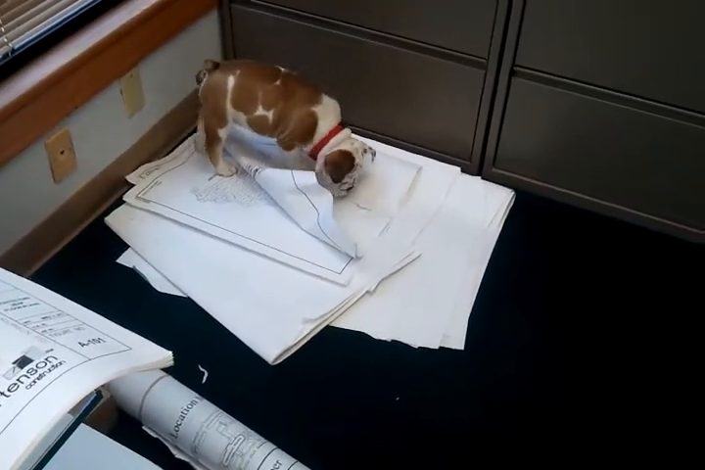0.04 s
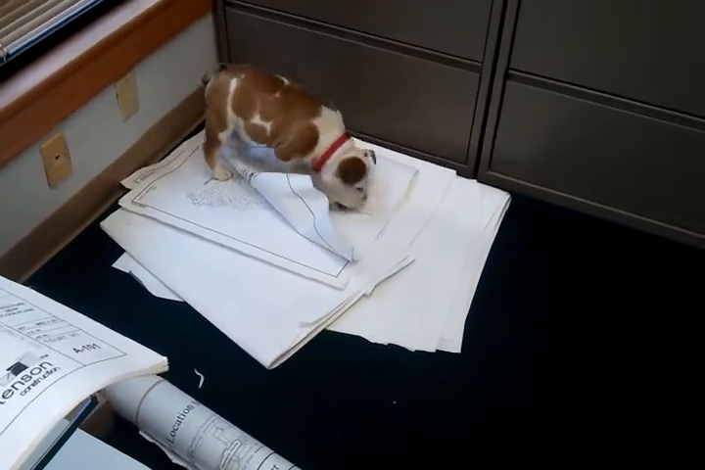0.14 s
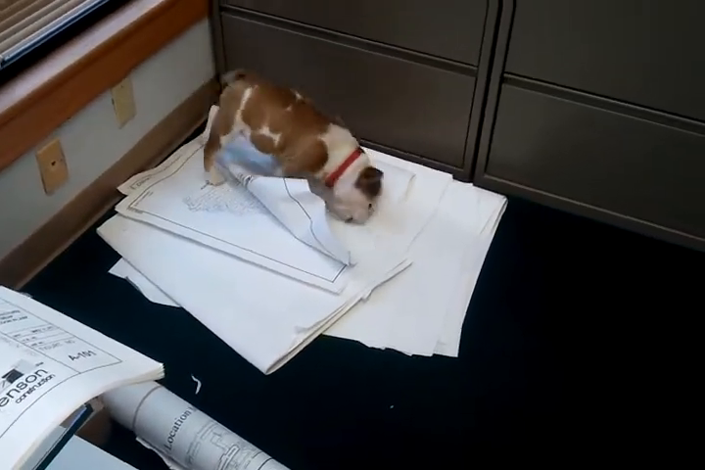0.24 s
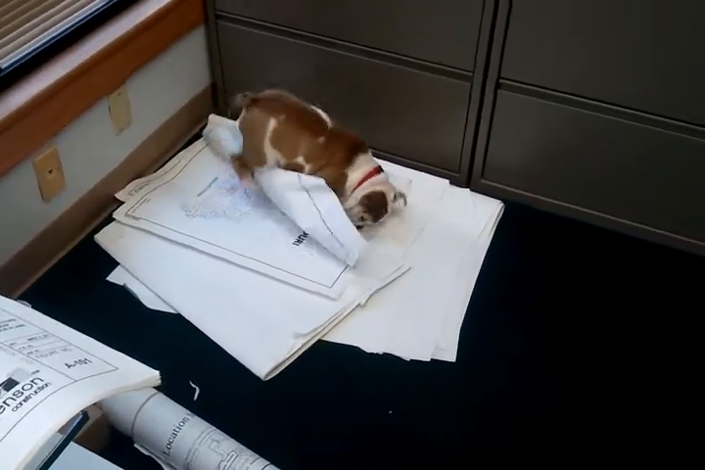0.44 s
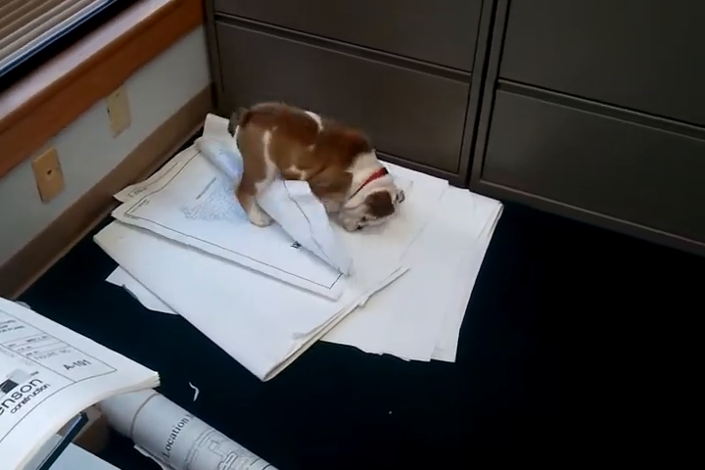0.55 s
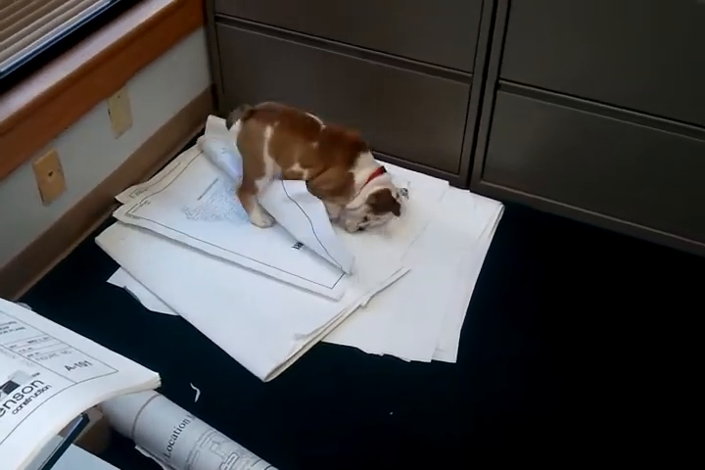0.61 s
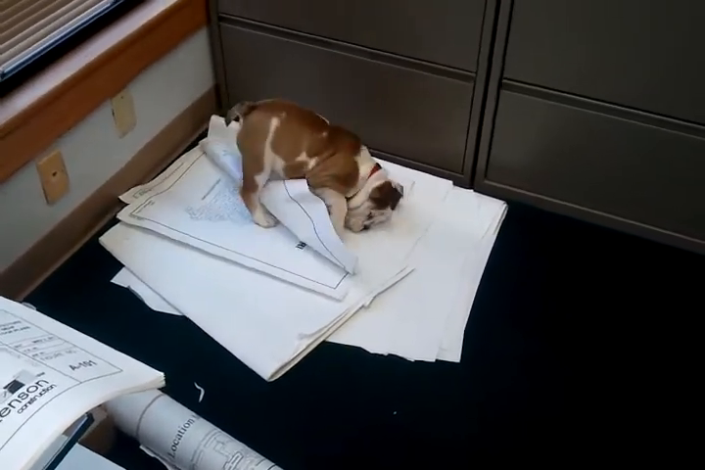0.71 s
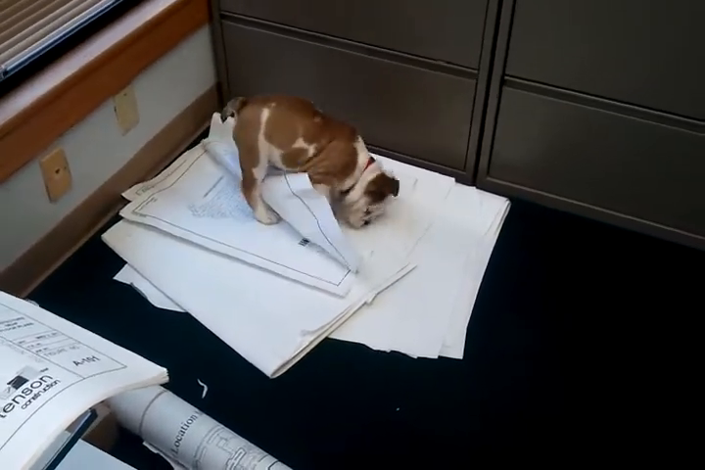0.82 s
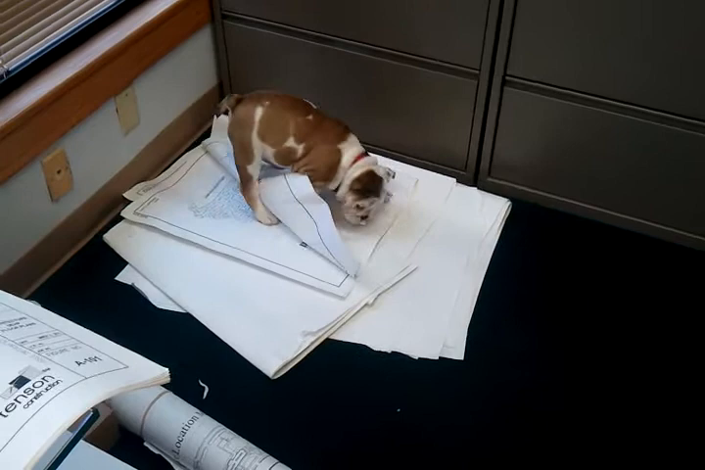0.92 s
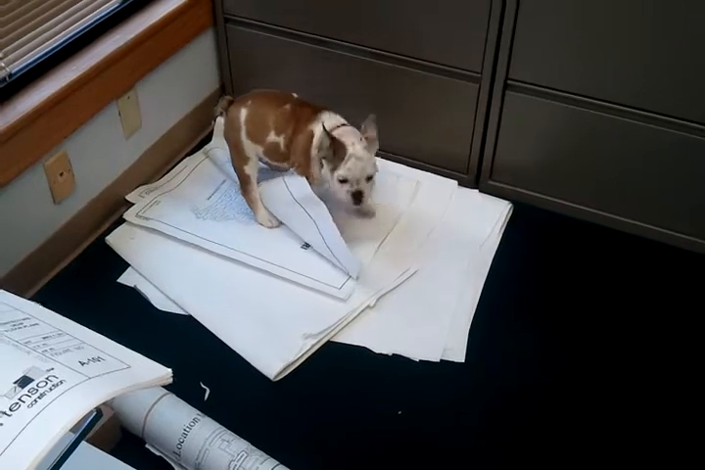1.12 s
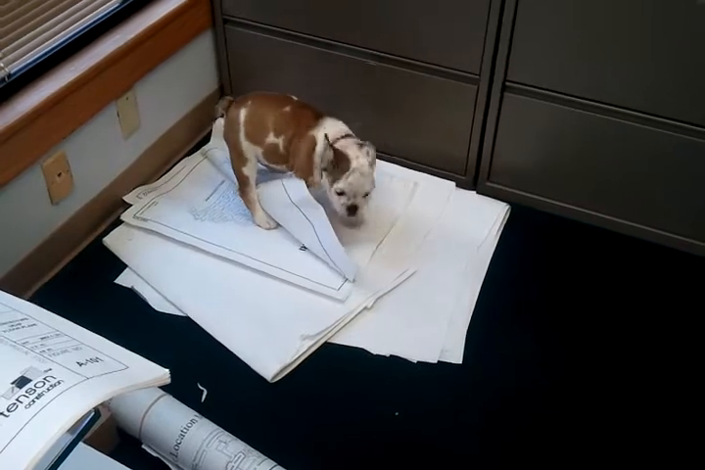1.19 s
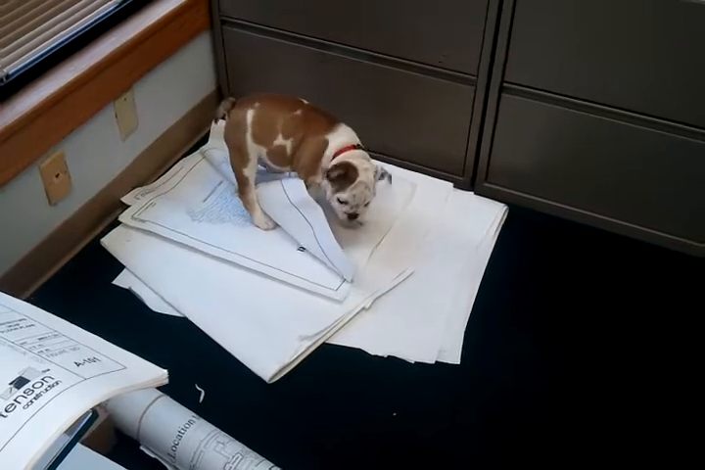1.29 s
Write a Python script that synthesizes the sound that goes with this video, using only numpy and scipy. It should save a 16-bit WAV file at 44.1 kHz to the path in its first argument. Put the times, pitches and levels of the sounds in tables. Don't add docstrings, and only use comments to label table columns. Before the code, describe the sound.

Paper rustling: sharp creases snap and sheets buckle hollowly in quick uneven bursts with a bright sliding hiss, soft paw thuds beneath, then a pause, another crackle and small ticks, over faint room hum.

```python
import sys
import numpy as np
from scipy import signal
from scipy.fft import rfft, irfft
from scipy.io import wavfile

SR = 44100
rng = np.random.default_rng(int(sys.argv[2]) if len(sys.argv) > 2 else 0)


def store_pcm(level_fs):
    pcm = np.round(np.clip(level_fs, -1, 1) * 32767).astype(np.int16)
    wavfile.write(sys.argv[1], SR, np.atleast_2d(pcm).T)


def how_loud(loudness_db):
    steps = np.asarray(loudness_db, float) / 20
    return 10 ** steps


N = 59535


def rms_one(x):
    return x / np.sqrt(np.mean(x ** 2) + 1e-20)


def drift(rate_hz):
    settle = 9000
    r = np.exp(-2 * np.pi * rate_hz / SR)
    wander = signal.lfilter([1], [1, -2 * r, r * r], rng.standard_normal(N + settle))
    return rms_one(wander[settle:])


def at_hz(spectrum, hz):
    point_hz, point_db = np.transpose(spectrum)
    return np.interp(np.log(hz), np.log(point_hz), point_db)


def colour(x, spectrum, centre_octave=0, narrowing_db=0):
    hz = np.maximum(np.fft.rfftfreq(4096, 1 / SR), 10)
    octave = np.log2(np.clip(hz, 100, 12000) / 1000)
    level_db = at_hz(spectrum, hz) - narrowing_db * (octave - centre_octave) ** 2
    cepstrum = irfft(np.log(how_loud(level_db)))
    cepstrum[1:2048] *= 2
    cepstrum[2049:] = 0
    response = irfft(np.exp(rfft(cepstrum)))
    return rms_one(signal.fftconvolve(x, response)[:N])


def grains(rate, spread_db, clump_db):
    sizes = how_loud(spread_db * np.minimum(rng.exponential(1, N), 3.0)) * rng.choice([-1, 1], N)
    born = rng.random(N) < rate / SR
    bed = 0.41 * rng.standard_normal(N)
    return (rms_one(sizes * born) + bed) * how_loud(clump_db * drift(220))


def envelope(start_s, hold_s, t60_s, rise_s):
    t = np.arange(N) / SR - start_s
    fading_s = np.maximum(t - rise_s - hold_s, 0)
    return np.clip(t / rise_s, 0, 1) * how_loud(-60 * fading_s / t60_s)


def burst(noise, shape):
    shaped = shape * noise
    return shaped * np.sqrt(np.sum(shape ** 2) / np.sum(shaped ** 2))


def click(start_s):
    return np.maximum(1 - abs(np.arange(N) - start_s * SR), 0)


def ring(x, hz, t60_s):
    r = how_loud(-60 / (t60_s * SR))
    w = 2 * np.pi * hz / SR
    return signal.lfilter([0, np.sin(w)], [1, -2 * r * np.cos(w), r * r], x + 1e-18)


def highpass(x, order, hz):
    return signal.sosfilt(signal.butter(order, hz, "high", fs=SR, output="sos"), x)


def room_noise():
    # frequency_hz, level_db
    noise_spectrum = [(20, -31), (60, -12), (90, -18), (220, -8.5), (300, -11.5), (800, -16.5),
                      (2500, -21.5), (7000, -21.5), (11000, -15.5)]
    return how_loud(-48) * colour(rng.standard_normal(N), noise_spectrum)


def sliding():
    # time_s, level_db, weight_on_sheet_db
    slide_path = [(0, -62.5, -16), (0.132, -48.5, -12), (.17, -70.5, 19), (.232, -48.5, -14),
                  (.26, -41.5, -8.5), (0.323, -29.5, -6.5), (0.376, -40.5, 0.5), (0.431, -46, -5.5),
                  (.485, -41.5, -5), (0.551, -37, -10), (.605, -41.5, -5), (.7, -49, -13),
                  (.76, -46.5, -9.5), (.81, -41.5, -12), (0.926, -39.5, -10), (1.1, -55.5, -10),
                  (1.2, -45.5, -8.5), (1.27, -51, -13)]
    # frequency_hz, level_db
    hiss_spectrum = [(800, -57), (2500, -36.5), (3600, -4), (4250, 0), (6800, 3), (8000, 0), (11000, -13.5)]
    # frequency_hz, level_db
    drag_spectrum = [(50, -51.5), (110, -17.5), (240, -2.5), (700, -1.5), (1400, -4), (3000, -6.5),
                     (10000, -27)]
    time_s, level_db, weight_db = np.transpose(slide_path)
    t = np.arange(N) / SR
    hiss = colour(grains(12000, 2.5, 1.2), hiss_spectrum)
    drag = colour(grains(6000, 4.0, 2.5), drag_spectrum)
    weight = how_loud(np.interp(t, time_s, weight_db))
    return how_loud(np.interp(t, time_s, level_db)) * (hiss + weight * drag)


def buckling():
    # start_s, peak_db, pitch_hz, hold_s, t60_s
    buckle_events = [(0.112, -36.5, 2720, 0.012, 0.067), (0.141, -29, 770, 0.002, 0.034),
                     (0.2414, -23, 904, 0.008, .07), (0.245, -25, 1410, 0.0041, 0.043),
                     (0.253, -24, 2840, 0.0049, 0.18), (0.29, -59, 990, 0.02, 0.11),
                     (0.346, -15, 810, 0.0061, 0.17), (0.349, -20, 1370, 0.012, 0.053),
                     (0.4957, -23, 847, 0.0079, 0.088), (0.56, -25, 1000, 0.0028, 0.021),
                     (0.574, -30, 785, 0.0061, 0.19), (0.6058, -23.5, 1220, 0.0056, 0.22),
                     (.614, -26, 740, 0.0084, 0.11), (.615, -30.5, 377, 0.027, 0.15),
                     (0.621, -25.5, 1830, 0.015, 0.052), (0.65, -21, 2490, .004, 0.075),
                     (0.932, -25.5, 733, 0.017, 0.21), (0.932, -27, 1450, 0.011, 0.13),
                     (0.94, -30.5, 392, 0.021, 0.2), (1.064, -59, 2850, 0.006, 0.054),
                     (1.131, -36, 1620, 0.012, 0.03), (1.155, -39.5, 1395, 0.015, 0.058),
                     (1.262, -41, 1640, 0.0097, 0.049), (1.319, -32, 1400, 0.009, 0.057)]
    half_band = 2 ** 0.45
    out = np.zeros(N)
    for start_s, peak_db, pitch_hz, hold_s, t60_s in buckle_events:
        edges_hz = [pitch_hz / half_band, pitch_hz * half_band]
        band = signal.butter(3, edges_hz, "band", fs=SR, output="sos")
        hollow = signal.sosfilt(band, grains(2500, 2.6, 1.0))
        out += how_loud(peak_db - 14.0) * burst(hollow, envelope(start_s, hold_s, t60_s, 0.0024))
    return out


def paws():
    # start_s, peak_db, pitch_hz, t60_s
    paw_events = [(0.134, -39, 239, 0.042), (0.297, -54, 237, 0.05), (0.344, -27.5, 233, 0.039),
                  (0.454, -42, 170, 0.069), (0.505, -27.5, 209, 0.045), (.565, -40, 214, 0.13),
                  (0.614, -27, 199, 0.014), (0.654, -40, 217, 0.045), (0.939, -33, 252.5, 0.14),
                  (1.038, -41, 191, 0.05), (1.159, -46.5, 212, 0.1), (1.197, -46, 177, 0.058),
                  (1.219, -43.5, 126, 0.063), (1.327, -36.5, 203, 0.045)]
    out = np.zeros(N)
    for start_s, peak_db, pitch_hz, t60_s in paw_events:
        shape = envelope(start_s, 0.00093, t60_s, 0.0043)
        thud = shape * np.sin(2 * np.pi * pitch_hz * (np.arange(N) / SR - start_s))
        band = signal.butter(2, [0.63 * pitch_hz, 3.1 * pitch_hz], "band", fs=SR, output="sos")
        puff = burst(signal.sosfilt(band, rng.standard_normal(N)), shape)
        out += how_loud(peak_db - 6.0) * (thud + 0.36 * puff)
    return out


def crackling():
    # start_s, peak_db, hold_s, t60_s, brightest_at_octaves_above_1_khz
    crackle_events = [(.1442, -34, .009, .07, 1.2), (.2385, -14, .007, .018, 2.7),
                      (.3205, -21, .003, .05, 2.5), (.3685, -22, .003, .04, 2.4),
                      (.4922, -25, .003, .07, 1.8), (.933, -28, .02, .15, 1.0), (.931, -19, .02, .22, 3.0),
                      (1.309, -36, .008, .05, 2.7), (.25, -25, .01, .15, 2.2), (.342, -20, .03, .12, 2.2),
                      (.515, -24, .01, .09, 2.8), (.613, -26, .004, .06, 2.3), (.6185, -22, .001, .03, 2.3),
                      (.628, -21, .008, .07, 2.2), (.651, -21, .003, .025, 1.8),
                      (.6575, -27, .002, .06, 1.8), (.803, -33, .005, .03, 3.2),
                      (1.044, -32, .01, .08, 1.8), (1.1342, -38, .002, .03, 2.1)]
    # frequency_hz, level_db
    crackle_spectrum = [(120, -43.5), (400, -12), (800, 1), (1800, 1), (3000, -1.5), (7000, 1.5),
                        (11000, -6.5)]
    crest_db = 8.5
    narrowing_db = 1.5
    out = np.zeros(N)
    for start_s, peak_db, hold_s, t60_s, centre_octave in crackle_events:
        swarm = colour(grains(10000, 3.5, 1.5), crackle_spectrum, centre_octave, narrowing_db)
        rise_s = 0.0014 + 0.13 * hold_s
        out += how_loud(peak_db - crest_db) * burst(swarm, envelope(start_s, hold_s, t60_s, rise_s))
    return out


def snapping():
    # start_s, peak_db, pitch_hz, ring_t60_ms
    snap_events = [(.1446, -26, 1300, 6), (.1446, -27, 5000, 9), (.1468, -32, 900, 12),
                   (.1495, -27, 3800, 12), (.157, -32, 3600, 9), (.1722, -32, 893, 16),
                   (.2392, -17, 5100, 5), (.24, -9, 4640, 9), (.24, -11, 7600, 8), (.243, -13, 6140, 10),
                   (.2456, -10, 1400, 7), (.2455, -9, 7200, 8), (.2515, -19, 2900, 10),
                   (.2548, -21, 2900, 9), (.2672, -21, 4400, 14), (.4925, -20, 2200, 4),
                   (.4934, -14, 4900, 9), (.4934, -19, 6500, 7), (.4932, -19, 1000, 10),
                   (.4985, -21, 936, 10), (.9355, -20, 7200, 12), (.9375, -20, 5300, 10),
                   (.9415, -20, 5400, 14), (.952, -16, 4400, 11), (.9635, -20, 5400, 12),
                   (.979, -23, 7800, 8), (.658, -17, 1750, 13), (1.1345, -31, 3900, 10),
                   (1.1345, -33, 1500, 14), (1.1348, -36, 5000, 8), (1.1398, -32, 1800, 14),
                   (1.3115, -33, 6400, 18), (1.315, -34, 5900, 10), (1.3168, -37, 4100, 10),
                   (1.3238, -34, 1150, 16), (1.326, -38, 2000, 10), (1.3295, -33, 1150, 14),
                   (.6194, -16, 1800, 9), (.6196, -20, 5000, 8), (.1505, -30, 2000, 8),
                   (.1515, -31, 5000, 8), (.3532, -17, 3350, 22), (.3592, -15, 1300, 16),
                   (.6295, -20, 4400, 15), (.635, -16, 5640, 8), (.635, -21, 1750, 9),
                   (.6425, -24, 1300, 8), (.666, -29, 3500, 4), (1.046, -30, 3400, 10)]
    damping = 0.7
    out = np.zeros(N)
    for start_s, peak_db, pitch_hz, t60_ms in snap_events:
        hit = click(start_s)
        edge = ring(hit, 3300, 0.0041) - ring(hit, 9400, 0.0025)
        body = ring(hit, pitch_hz, damping * t60_ms / 1000)
        out += how_loud(peak_db - 18) * edge - how_loud(peak_db - 4) * body
    return out


def reflections(x):
    t60_s, build_up_s, wall_cut_hz = 0.19, 0.012, 5700
    t = np.arange(SR // 2) / SR
    tail = rng.standard_normal(len(t)) * how_loud(-60 * t / t60_s) * np.clip(t / build_up_s, 0, 1)
    tail = signal.lfilter([1], [1, -np.exp(-2 * np.pi * wall_cut_hz / SR)], tail)
    return signal.fftconvolve(x, tail / np.sqrt(np.sum(tail ** 2)))[:N]


def scene():
    paper = highpass(crackling() + snapping(), 3, 480)
    hits = paper + highpass(buckling() + paws(), 2, 110)
    mix = hits + how_loud(-13) * reflections(hits) + sliding() + room_noise()
    return mix[None]


def roll_off(x):
    return signal.sosfilt(signal.butter(12, 9420, fs=SR, output="sos"), x)


def record(dry):
    narrow_top = signal.cheby2(14, 85, 9824, fs=SR, output="sos")
    mix = signal.sosfilt(narrow_top, dry)
    return roll_off(mix)


dry = scene()
out = record(dry)
store_pcm(out)
```